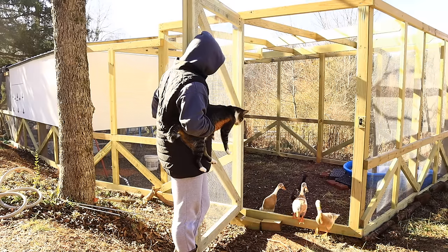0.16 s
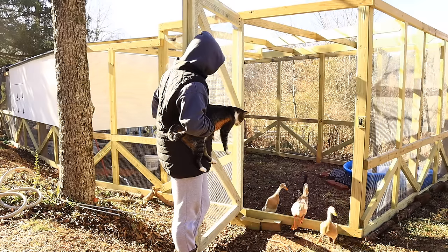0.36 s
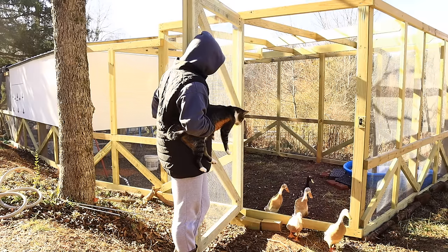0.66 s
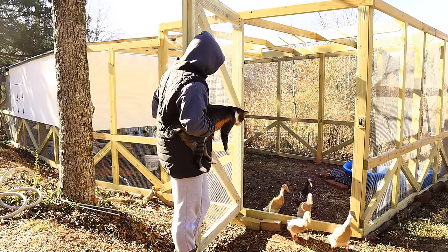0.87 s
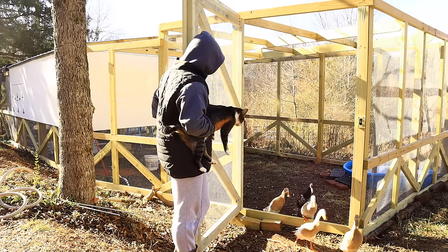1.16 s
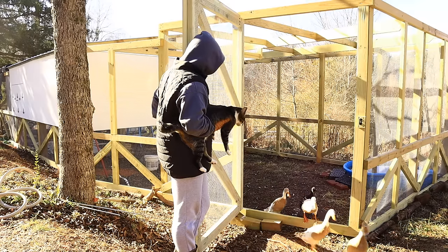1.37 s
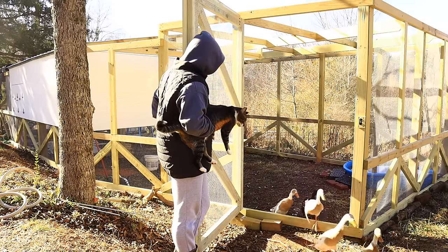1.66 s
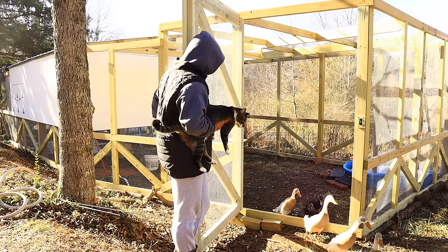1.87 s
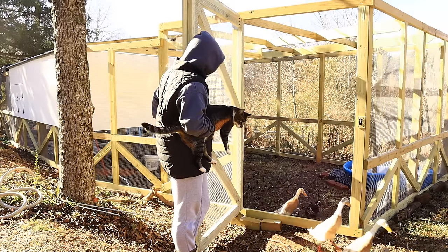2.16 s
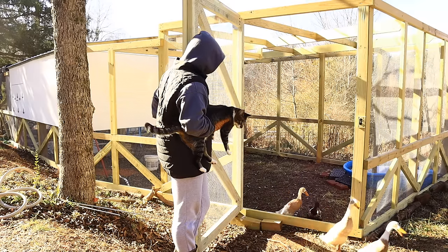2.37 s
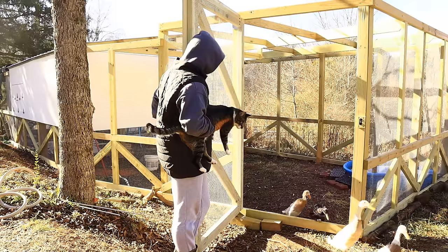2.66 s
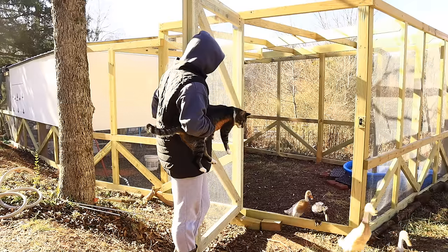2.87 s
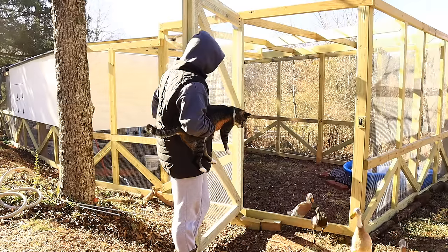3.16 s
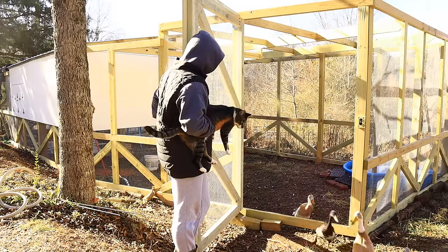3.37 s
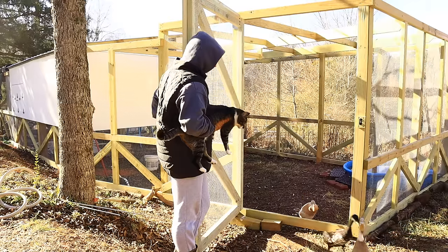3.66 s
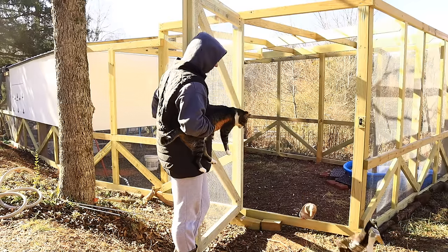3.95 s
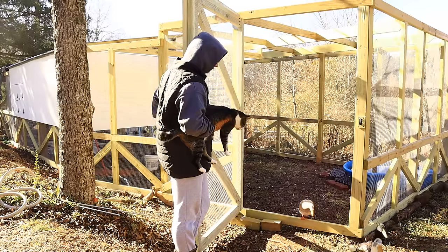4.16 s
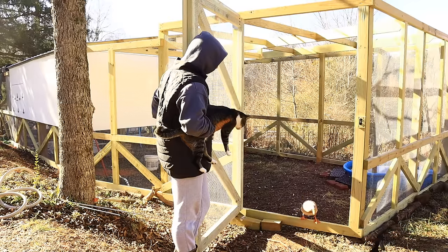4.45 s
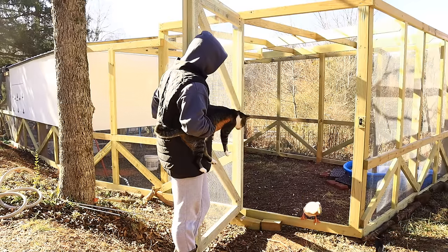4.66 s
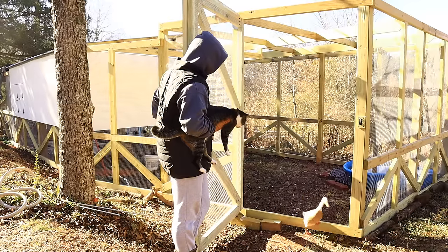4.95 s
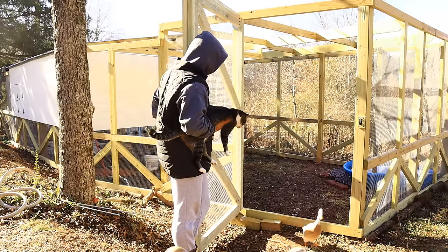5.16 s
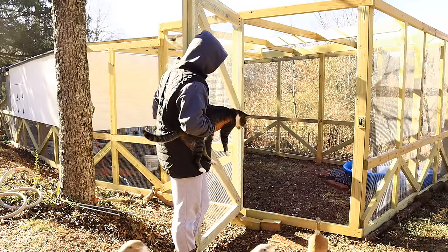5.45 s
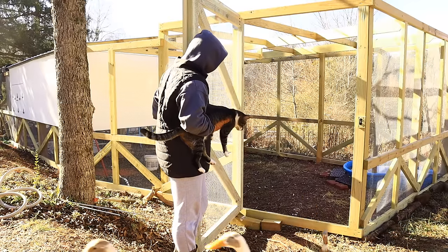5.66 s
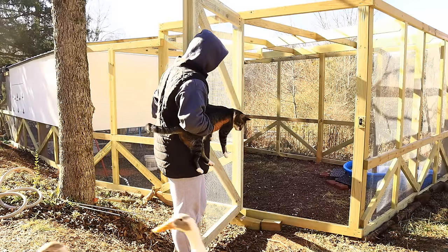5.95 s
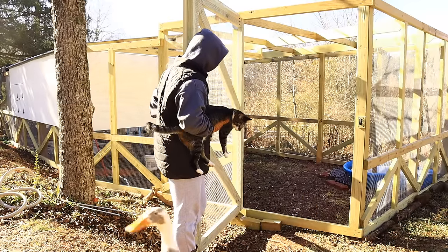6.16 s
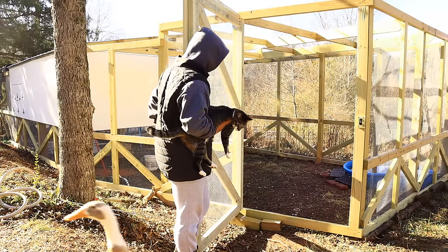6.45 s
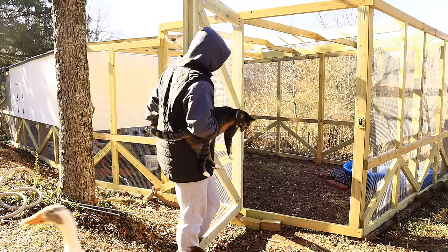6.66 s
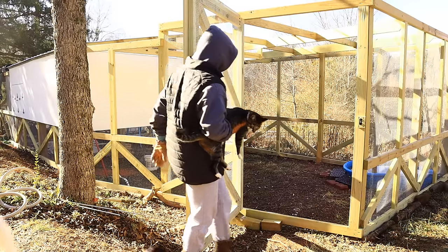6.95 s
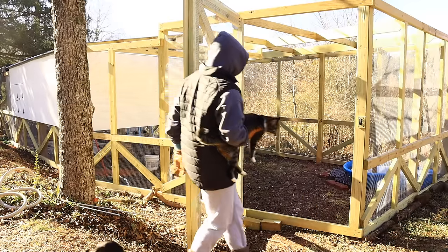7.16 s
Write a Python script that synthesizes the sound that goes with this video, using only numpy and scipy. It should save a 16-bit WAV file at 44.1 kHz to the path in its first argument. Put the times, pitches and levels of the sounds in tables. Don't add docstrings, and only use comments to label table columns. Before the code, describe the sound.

A small flock of ducks chatters in hoarse, nasal quacks while waddling past over crunchy leaves, with a faint engine hum far off.

```python
import sys
import numpy as np
from scipy import signal
from scipy.fft import rfft, irfft
from scipy.io import wavfile
from scipy.ndimage import uniform_filter1d

SR = 44100
rng = np.random.default_rng(int(sys.argv[2]) if len(sys.argv) > 2 else 0)


def store_wav(level_fs):
    pcm = np.round(np.clip(np.atleast_2d(level_fs), -1, 1) * 32767)
    wavfile.write(sys.argv[1], SR, pcm.T.astype(np.int16))


def field_ratio(decibels):
    return 10 ** (np.asarray(decibels, dtype=float) / 20)


N = 322371


def evened(x):
    return x / np.sqrt(np.mean(x ** 2) + 1e-20)


def read(points, hz):
    f, value = np.transpose(points)
    return np.interp(np.log(hz + 1), np.log(f + 1), value)


def curves(rows, t):
    s, *columns = np.transpose(rows)
    return [np.interp(t, s, c) for c in columns]


def wander(hz):
    noise = uniform_filter1d(rng.standard_normal(N), 40)
    return evened(signal.lfilter([1], [1, -np.exp(-2 * np.pi * hz / SR)], noise))


def resonate(x, hz, width):
    turn = np.exp(2j * np.pi * np.cumsum(hz * np.ones(len(x))) / SR)
    r = np.exp(-np.pi * width / SR)
    return 2 * (turn * signal.lfilter([1 - r], [1, -r], x / turn + 1e-18)).real


def steep(x, hz, width):
    return resonate(resonate(x, hz, width), hz, 2.5 * width)


def coloured(x, points):
    return irfft(rfft(x) * field_ratio(read(points, np.fft.rfftfreq(len(x), 1 / SR))), len(x))


def pulses(hz, shimmer_db):
    turns = np.cumsum(hz) / SR
    shut = np.diff(np.floor(turns), prepend=0) > 0
    return shut * field_ratio(shimmer_db * rng.standard_normal(N)) * np.sqrt(SR / hz), turns


# f/Hz, level/dB per Hz
WASH = [(15, -35), (25, -60), (93, -0.5), (379, 0), (985, -15), (1380, -7), (1610, -8.5), (3520, -20),
        (4000, -17), (5200, -49), (8800, -120)]
WASH_DB = -43.5
# t/s, level/dB
ENGINE = [(0.0, -50), (0.83, -46.5), (3.5, -49), (4.2, -58), (7.31, -62)]


def yard():
    shared, apart, rumble = rng.standard_normal((3, N))
    wash = np.array([coloured(shared + 0.052 * apart, WASH), coloured(shared - 0.51 * apart, WASH)])
    hum = evened(resonate(resonate(rumble, 61, 12), 63, 14))
    return field_ratio(WASH_DB) * evened(wash) + hum * field_ratio(curves(ENGINE, np.arange(N) / SR)[0])


# t/s, level/dB
LEAVES = [(0.0, -62), (0.12, -36), (0.49, -56), (1.79, -52.5), (1.83, -105), (1.87, -83), (2.18, -35),
          (2.2, -52.5), (2.67, -42), (6.33, -38.5), (6.37, -102), (6.39, -43.5), (7.31, -38.5)]
# f/Hz, level/dB
LEAF = [(1000, -19), (3000, -1.5), (6000, 1), (8000, 3.5), (10000, 8), (12000, -1), (14000, -16),
        (16000, -34)]
# t/s, peak level/dB
SNAPS = [(0.094, -16.5), (0.105, -20), (0.117, -22), (0.13, -25), (0.9123, -33), (1.719, -37),
         (2.834, -23.5), (2.8797, -26), (3.033, -20.5), (4.561, -33), (4.884, -27), (5.7201, -24.5),
         (6.596, -37), (6.6254, -26)]


def leaves(cracks_per_s=6000, bed=0.57, patchy_db=9.0):
    size = field_ratio(4.0 * np.minimum(rng.exponential(1, N), 2.5)) * rng.standard_normal(N)
    cracks = size * (rng.random(N) < cracks_per_s / SR)
    crackle = evened(cracks) + bed * rng.standard_normal(N)
    hz, t, z = signal.stft(crackle, SR, nperseg=256)
    patches = rng.standard_normal(z.shape[::-1]).T
    patches = evened(uniform_filter1d(uniform_filter1d(patches, size=12, axis=0), size=14, axis=1))
    crackle = signal.istft(z * field_ratio(patchy_db * patches), SR, nperseg=256)[1][:N]
    tread_db = np.maximum(curves(LEAVES, np.arange(N) / SR)[0], -61) + 6
    crackle = evened(coloured(crackle, LEAF)) * field_ratio(tread_db)
    hits = np.zeros(N)
    for s, db in SNAPS:
        hits[round(s * SR)] = field_ratio(db + 11.0)
    snap = coloured(rng.standard_normal(600), LEAF) * np.exp(-np.arange(600) / 130)
    return crackle + signal.oaconvolve(hits, snap / abs(snap).max())[:N]


# t/s, length/s, first f/Hz, last f/Hz, level/dB
PEEPS = [(0, 0.025, 3440, 3240, -38), (0.427, 0.064, 3547, 3540, -48), (.6, 0.13, 3200, 3150, -54),
         (0.672, 0.07, 1466, 1760, -40), (1.302, 0.19, 3503, 3342, -40.5), (2.183, 0.038, 1088, 888, -40),
         (3.24, 0.035, 1160, 903, -31), (3.425, 0.036, 1100, 905.4, -51), (3.681, 0.025, 1196, 955, -44),
         (3.948, 0.03214, 1067, 863, -34), (4.127, 0.025, 1052, 904, -33), (4.038, 0.071, 774, 702, -34.5),
         (4.349, 0.039, 1039, 900, -29), (6.074, 0.09, 3450, 3404, -41), (6.229, 0.092, 3153, 2877, -45),
         (6.86, 0.041, 1547, 1668, -30.5), (6.959, 0.099, 3560, 3405, -44)]
# t/s, peak level/dB
STEPS = [
    (4.108, -17),
    (5.48, -14),
    (5.97, -14.5),
    (6.875, -10),
    (6.291, -18.5),
    (6.438, -12),
    (6.686, -11),
    (7.144, -10.5),
]


def small_sounds():
    out = np.zeros(N + SR)
    for s, length, first_hz, last_hz, db in PEEPS:
        hz = np.linspace(first_hz, last_hz, round(length * SR))
        hz = hz * (1 + 0.2 * uniform_filter1d(rng.standard_normal(len(hz)), 300))
        peep = np.sin(2 * np.pi * np.cumsum(hz) / SR) * signal.windows.tukey(len(hz), .6)
        out[round(s * SR):][:len(hz)] += field_ratio(db + 2.5) * peep
    for s, db in STEPS:
        slap = resonate(rng.standard_normal(900), 556.2, 870) / 3 * np.exp(-np.arange(900) / 250)
        out[round(s * SR):][:900] += field_ratio(db + 8.5) * slap
    return out[:N]


# t/s, length/s, effort level/dB, pitch f/Hz, bill f/Hz
CLEAR = [(0.887, 0.1, -21.5, 244.9, 1868), (1.2, 0.075, -27.5, 228.2, 1993),
         (1.468, 0.11, -22, 268.1, 2400), (2.045, 0.112, -23, 247.7, 2130), (2.36, 0.1, -22, 248.7, 2018),
         (2.542, 0.087, -27.5, 232.5, 1886), (3.48, 0.12, -23.5, 276.4, 2417),
         (3.793, 0.06, -27, 238.1, 2260), (3.851, 0.1, -25.5, 232.9, 1832),
         (5.811, 0.08, -19.5, 263.7, 1957), (6.526, 0.049, -20, 258.5, 2199),
         (7.179, 0.075, -17, 260.7, 1954)]
HELD = [
    (1.942, 0.11, -25.5, 228.5, 2160),
    (2.267, 0.094, -27.5, 222, 1970),
    (4.252, 0.16, -24, 225.3, 1852),
    (5.146, 0.053, -31.5, 168.9, 1700),
]
HOARSE = [(0.466, 0.051, -27, 226, 1900), (0.525, 0.052, -27, 220.5, 1870),
          (0.711, 0.066, -26.5, 225.6, 1721), (1.677, 0.11, -22, 247, 2071),
          (2.706, 0.098, -20.5, 260.8, 2270), (4.148, 0.11, -22.5, 237.6, 1910),
          (4.755, 0.1, -26.5, 229.5, 1897), (4.86, 0.066, -25.5, 244.9, 1991),
          (5.023, 0.057, -28.5, 259.7, 1780), (5.38, 0.061, -20.5, 248.9, 1885),
          (5.906, 0.037, -22.5, 140.6, 1550), (6.15, 0.07, -19.5, 201.5, 1929),
          (6.341, 0.041, -20.5, 213.6, 2066), (6.466, 0.027, -26, 199.4, 1655),
          (6.71, 0.098, -17.5, 232.2, 1884), (6.898, 0.078, -20, 231.2, 1891),
          (7.261, 0.026, -20, 149.9, 2017)]
MUTTERS = [(0.008, 0.12, -28.5, 227.7, 1770), (0.597, 0.029, -33.5, 280, 2300),
           (0.779, 0.071, -30, 148.5, 1610), (0.847, 0.034, -28.5, 151.7, 1980),
           (1.322, 0.1, -24, 199, 1741), (1.612, 0.021, -29, 155, 2003), (1.837, 0.05, -27, 208.3, 1860),
           (2.189, 0.063, -30.5, 209.8, 1890), (3.055, 0.09, -28.5, 188, 1720),
           (3.605, 0.067, -25, 215, 1686), (3.955, 0.05, -25.5, 206, 2330),
           (4.023, 0.083, -45, 252.4, 1614), (4.589, 0.089, -29.5, 185, 2125),
           (4.679, 0.086, -31, 157.7, 1773), (6.682, 0.018, -42, 265.9, 1500)]
SWELLS = [
    (2.839, 0.14, -28, 202.6, 1855),
    (3.206, 0.08, -33, 219.4, 1995),
    (3.41, 0.074, -30.5, 234.8, 2363),
    (4.924, 0.072, -30.5, 168.4, 1585),
    (5.079, 0.057, -28, 219.9, 2064),
    (5.996, 0.083, -25.5, 214, 2144),
]
SHRILL = [
    (5.284, 0.085, -33.5, 172.2, 2366),
    (5.509, 0.065, -29, 187.2, 1705),
    (5.582, 0.082, -26.5, 242.3, 2065),
    (5.678, 0.1, -22, 197.5, 1914),
    (7.028, 0.086, -26, 222.1, 2225),
]
SAGGING = [
    (0.188, 0.11, -21.5, 221.3, 1890),
    (0.35, 0.049, -23.5, 196.3, 1860),
    (1.107, 0.089, -20.5, 253.7, 2319),
    (3.7, 0.09, -22, 290.3, 1740),
]
KINDS = [CLEAR, HELD, HOARSE, MUTTERS, SWELLS, SHRILL, SAGGING]
# start pitch/ratio, end pitch/ratio, start effort/dB, end effort/dB
CONTOUR = [
    (.95, .84, 1.5, 0),
    (1.036, 1.03, -0.5, 1.5),
    (1.1, .79, -1.5, -2.5),
    (1.089, .82, -7, -2.5),
    (.97, 1.0, -2.5, 3),
    (1.08, .9, -4.5, -2.5),
    (1.04, .78, -0.5, -2.5),
]
# roughness/0-1, throat f/Hz, bill level/dB, rasp level/dB, chest level/dB
TIMBRE = [
    (0.09, 1349, -1, 8, -.5),
    (.1, 1425, 0, 5, -3),
    (0.48, 1310, -2.5, 6, 0.5),
    (.7, 1370, -10, 5.5, 1),
    (.78, 1220, 1, 10.5, 0),
    (0.55, 1670, -10.5, 0, -.5),
    (.2, 1343, -3.5, 7, -0.5),
]


def quacks():
    rows = []
    for kind, move, ring in zip(KINDS, CONTOUR, TIMBRE):
        rows += [(*row, *move, *ring) for row in kind]
    rows = np.array(rows)
    return rows[np.argsort(rows[:, 0])].T


# f/Hz, width/Hz, level/dB
RASP = [(3285, 550, -16), (4280, 450, -21), (5170, 187, -14.5), (6880, 3600, -29.5)]
# t/s, level/dB
FACING = [(0.0, 4.5), (0.9, 1), (1.9, 0), (2.8, 0), (3.7, 0), (4.3, -2), (5.3, 3), (6.2, 1.5), (7.31, -2.5)]
BILL_REST_HZ, EFFORT_REST_DB = 2000, -22
THROAT_FOLLOWS_BILL = 0.32
BILL_PER_EFFORT, RASP_PER_EFFORT, CHEST_PER_EFFORT = 0.41, 0.64, -0.3
KNEE = 0.55
VOICE_LOW_HZ, VOICE_TOP_HZ = 325, 7640


def ducks(chest_db=-10, neck_db=-9, width=190, rise=0.019, fall=0.026, hush_db=24):
    t = np.arange(N) / SR
    s, length, effort, top_hz, bill_hz, *kind = quacks()
    first, last, first_db, last_db, rough, throat_hz, bill_db, rasp_db, boom_db = kind
    pitch = top_hz * np.array([first, np.ones_like(s), last])
    push = effort - EFFORT_REST_DB
    ring = (rough, throat_hz * (bill_hz / BILL_REST_HZ) ** THROAT_FOLLOWS_BILL, bill_hz,
            bill_db + BILL_PER_EFFORT * push, rasp_db + RASP_PER_EFFORT * push,
            boom_db + CHEST_PER_EFFORT * push)
    marks = np.maximum.accumulate((s + length * np.array([[0], [KNEE], [1]])).T.ravel())
    hz = uniform_filter1d(np.interp(t, marks, np.transpose(pitch).ravel()), size=900)
    held = [uniform_filter1d(np.interp(t, marks, np.repeat(c, 3)), 400) for c in ring]
    rough, throat_hz, bill_hz, bill_db, rasp_db, boom_db = held

    power = np.zeros(N)
    for start, span, a, b, c in zip(s, length, effort + first_db, effort, effort + last_db):
        times = start + np.r_[-2 * rise, -.5 * rise, .15 * span, .5 * span, .85 * span,
                              span + fall, span + 2 * fall]
        levels = np.r_[-90, a - hush_db, a, b, c, c - hush_db, -90]
        power = np.maximum(power, np.interp(t, times, field_ratio(levels) ** .5))

    rough = np.clip(rough, .17, 1)
    own, turns = pulses(hz * field_ratio(.45 * (.08 + rough) * wander(90)), 2.0 + 3.0 * rough)
    other_hz = np.clip(200 * field_ratio(1.3 * wander(6) + .3 * wander(90)), 120, 300)
    other = pulses(other_hz, 2.5)[0]
    puffs = evened(np.exp(-(turns % 1) / .3) * rng.standard_normal(N))
    drive = np.sqrt(1 - .75 * rough) * own + .45 * rough * other + (.08 + .35 * rough) * puffs
    airy = drive + .33 * puffs

    glide = (hz / uniform_filter1d(hz, 5000)) ** 0.5
    glide = glide * field_ratio(.25 * wander(12))
    voice = steep(drive, throat_hz * glide, width)
    voice = voice - field_ratio(bill_db) * steep(airy, bill_hz * glide, 1.53 * width)
    voice = voice - field_ratio(neck_db) * steep(drive, 860 * glide, 450)
    voice = voice + field_ratio(bill_db - 3) * steep(airy, 1.288 * bill_hz * glide, 227)
    rasp = np.zeros(N)
    for k, (f, w, db) in enumerate(RASP):
        rasp -= (-1) ** k * field_ratio(db) * steep(airy, f * glide, w)
    voice = voice + field_ratio(rasp_db + curves(FACING, t)[0]) * rasp
    swoop = field_ratio(1.2 * wander(5))
    voice = voice + 1.93 * rough * (steep(other, 1150 * swoop, 158) - steep(other, 1900 * swoop, 120))
    voice = voice / np.sqrt(uniform_filter1d(voice ** 2, 3000))
    band = signal.butter(3, [VOICE_LOW_HZ, VOICE_TOP_HZ], "band", fs=SR, output="sos")
    voice = signal.sosfilt(band, voice)
    boom = evened(steep(drive, hz, 166))
    return uniform_filter1d(power ** 2, 150) * (voice + field_ratio(chest_db + boom_db) * boom)


# t/s, length/s, first f/Hz, last f/Hz, level/dB
SQUAWKS = [
    (0.138, 0.099, 1010, 1510, -30.5),
    (5.1, 0.06, 2270, 1297, -26),
    (5.136, 0.09, 1168, 1127, -23),
    (5.285, 0.066, 2020, 2110, -23),
    (5.588, 0.08, 1750, 2600, -26),
    (5.992, 0.042, 1604, 899, -26),
    (6.386, 0.051, 2700, 2060, -25.5),
    (6.875, 0.025, 1585, 991, -45),
    (7.019, 0.033, 1510, 911, -33),
]
SQUAWK_HZ, SQUAWK_WIDTH_HZ = 330, 350
SQUAWK_UPPER, SQUAWK_UPPER_DB = 1.23, -1


def squawks():
    out = np.zeros(N)
    drive = pulses(SQUAWK_HZ * field_ratio(.8 * wander(40)), 2.5)[0] + .3 * rng.standard_normal(N)
    for s, length, first_hz, last_hz, db in SQUAWKS:
        part = drive[round(s * SR):][:round(length * SR)]
        hz = np.geomspace(first_hz, last_hz, len(part))
        upper = steep(part, SQUAWK_UPPER * hz, SQUAWK_WIDTH_HZ)
        ring = steep(part, hz, SQUAWK_WIDTH_HZ) - field_ratio(SQUAWK_UPPER_DB) * upper
        out[round(s * SR):][:len(part)] += field_ratio(db) * evened(ring) * signal.windows.tukey(len(part), .6)
    return out


def echoes(x, t60=0.056, first=120):
    slots = np.arange(first, 9000, 30)
    at = slots + rng.integers(0, 30, (2, len(slots)))
    taps = np.zeros((2, 9100))
    np.put_along_axis(taps, at, rng.choice([-1., 1.], at.shape) * field_ratio(-60 * at / SR / t60), 1)
    dull = signal.sosfilt(signal.butter(2, [800, 7000], "band", fs=SR, output="sos"), x)
    return signal.fftconvolve(dull[None], taps / np.linalg.norm(taps[0]), axes=1)[:, :N]


# f/Hz, lead/radians
PORT_LEAD = [(0, 0), (690, -.1), (1210, -.4), (2240, -1.3), (3530, -2.2), (5940, -2.8), (10600, -3.0)]
# f/Hz, share/ratio
PORT_SHADE = [(100, 0.0615), (380, 0.24), (700, 0.79), (1290, 1.63), (2380, 1.84), (4400, 0.95),
              (8100, 0.54)]
# t/s, level/dB
SIDE_DB = [(0.0, -6), (4.5, -5.5), (5.84, -3), (7.31, 1)]


def ports(x):
    hz, t, z = signal.stft(x, SR, nperseg=512)
    side_db = read(PORT_SHADE, hz)[:, None] * curves(SIDE_DB, t)[0]
    half = field_ratio(side_db / 2) * np.exp(.5j * read(PORT_LEAD, hz)[:, None])
    return signal.istft(np.array([z * half, z / half]), SR, nperseg=512)[1][:, :N]


def scene():
    feet = leaves()
    flock = field_ratio(4.0) * ducks() + small_sounds() + squawks()
    apart = field_ratio(-9) * np.array([np.roll(feet, 31), np.roll(feet, 53)])
    return ports(flock + feet) + apart + field_ratio(-7) * echoes(flock) + yard()


def band_limit(x):
    return signal.sosfilt(signal.butter(12, 15960, fs=SR, output="sos"), x)


def record(dry):
    rounded = dry / (1 + abs(dry) ** 6) ** (1 / 6)
    return band_limit(rounded)


dry = scene()
out = record(dry)
store_wav(out)
```